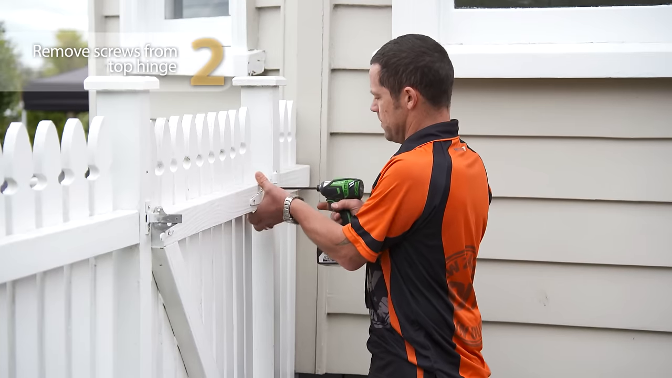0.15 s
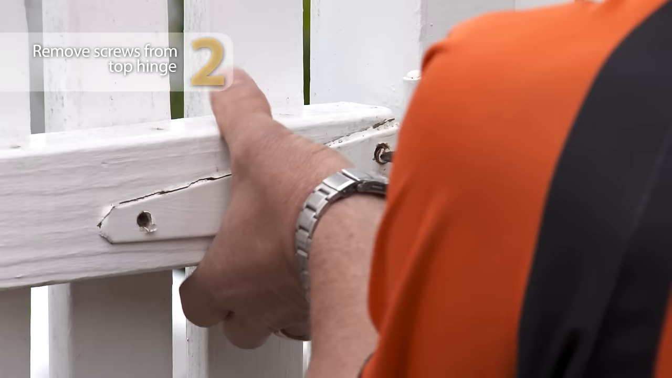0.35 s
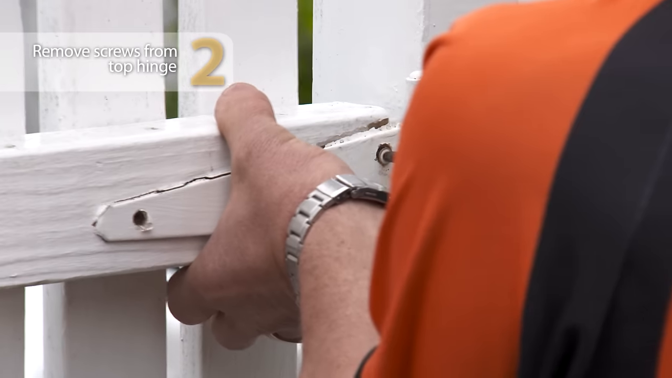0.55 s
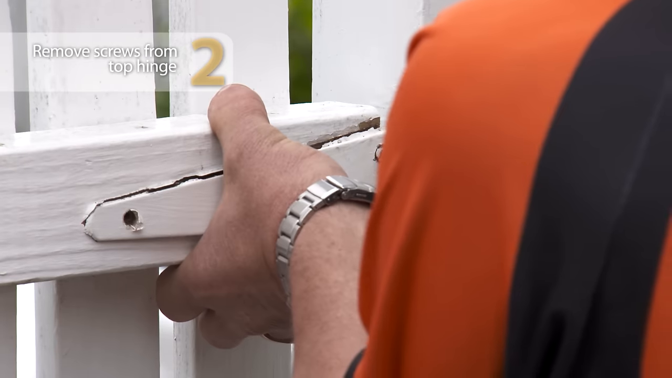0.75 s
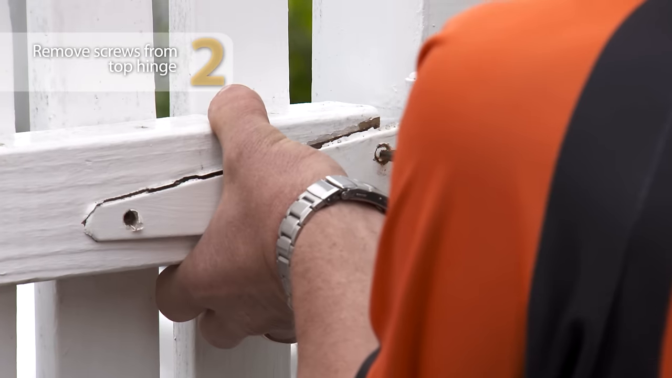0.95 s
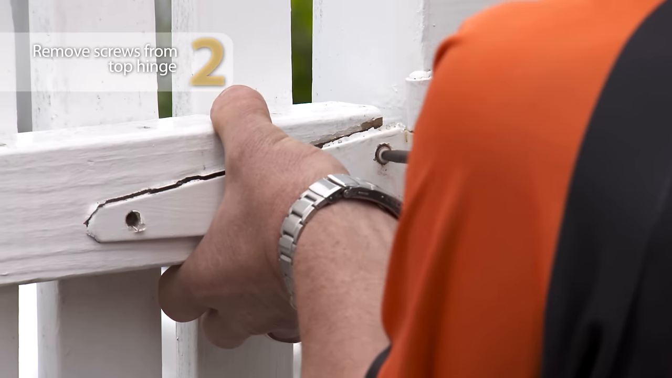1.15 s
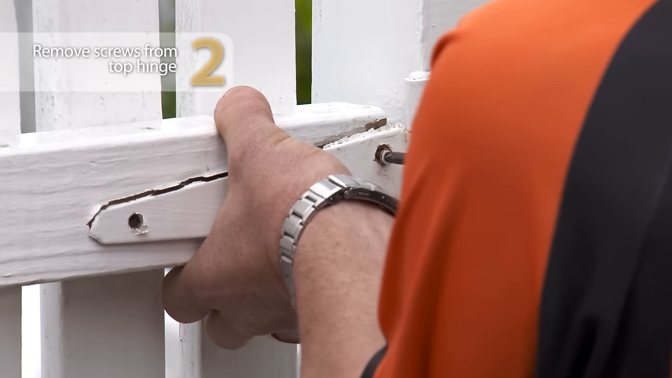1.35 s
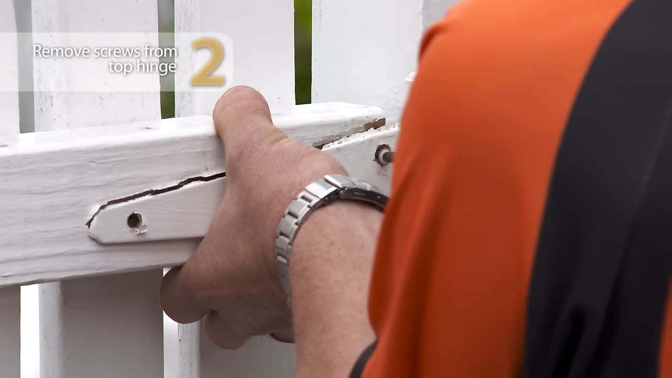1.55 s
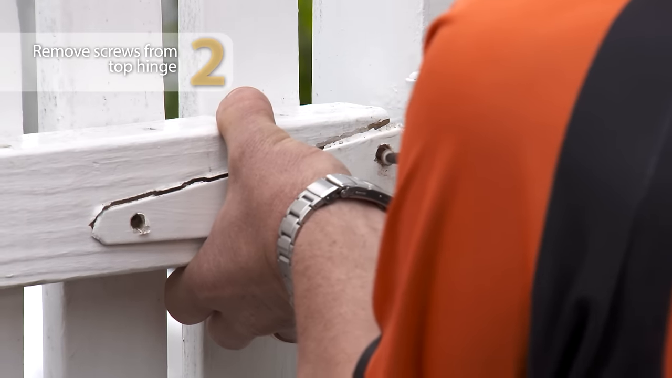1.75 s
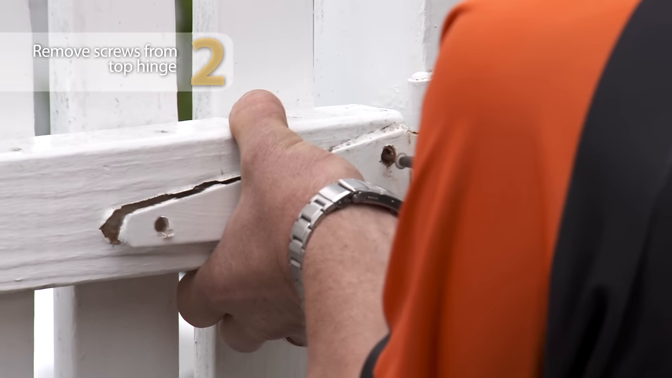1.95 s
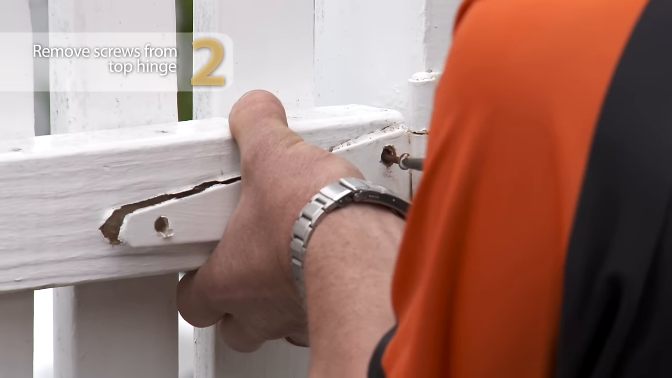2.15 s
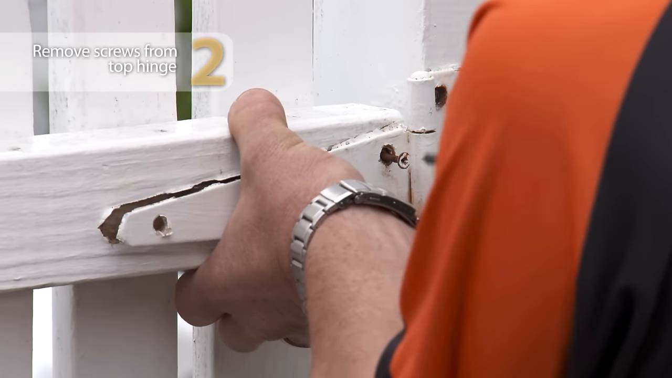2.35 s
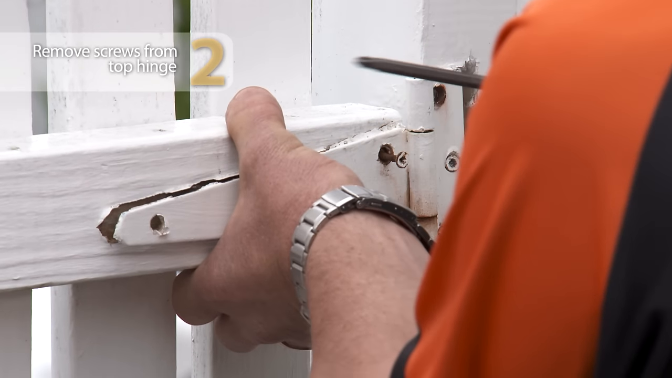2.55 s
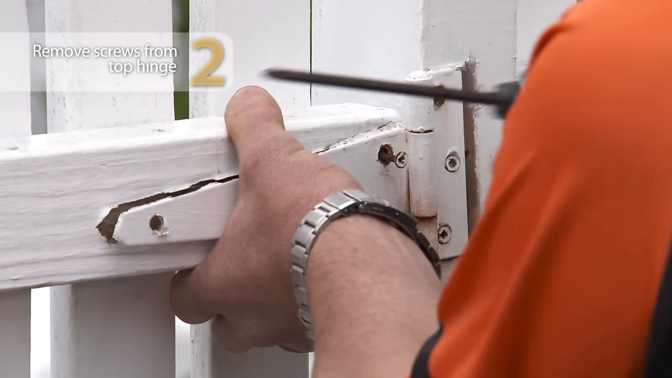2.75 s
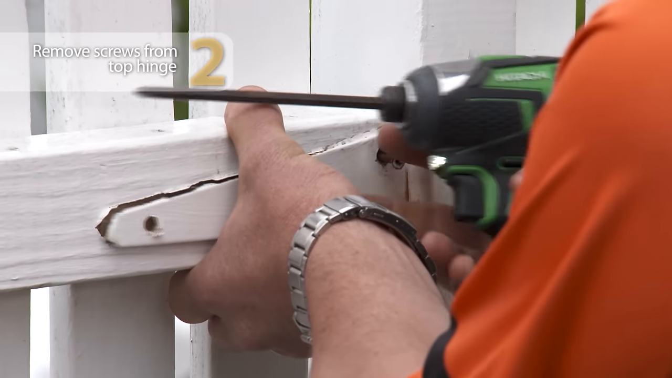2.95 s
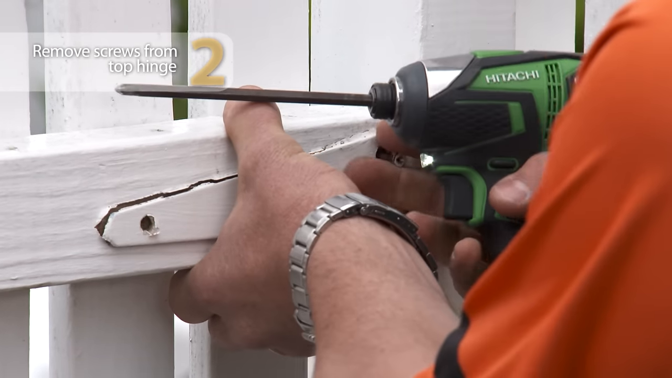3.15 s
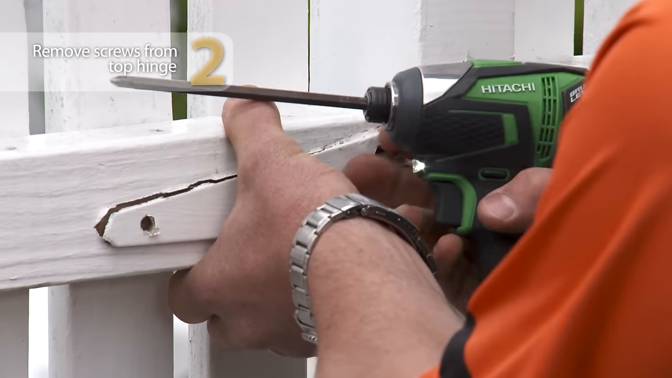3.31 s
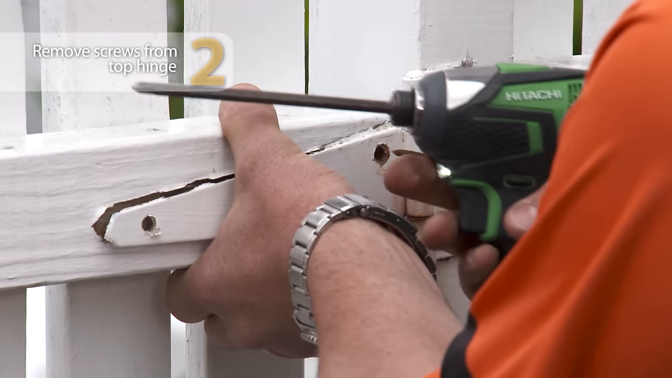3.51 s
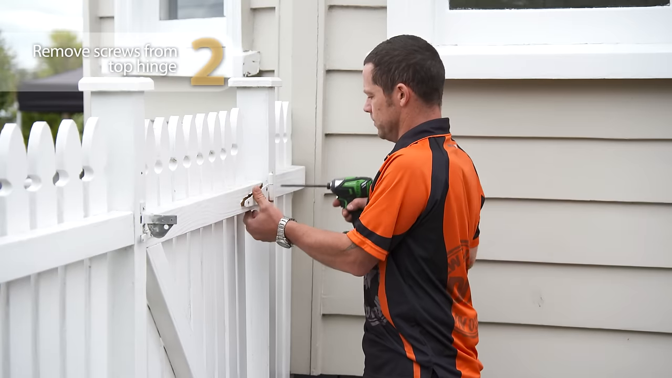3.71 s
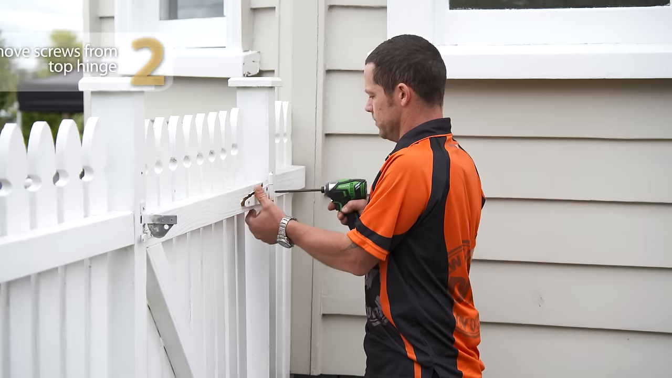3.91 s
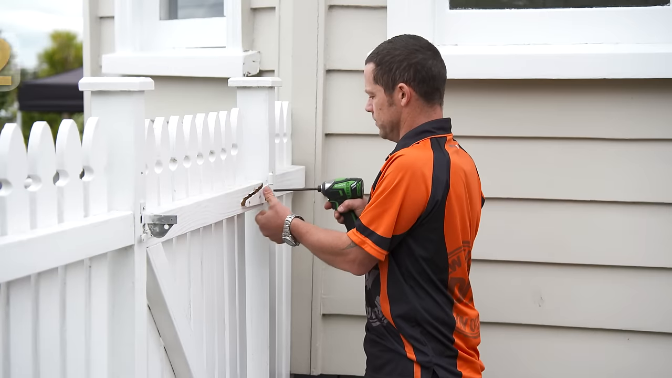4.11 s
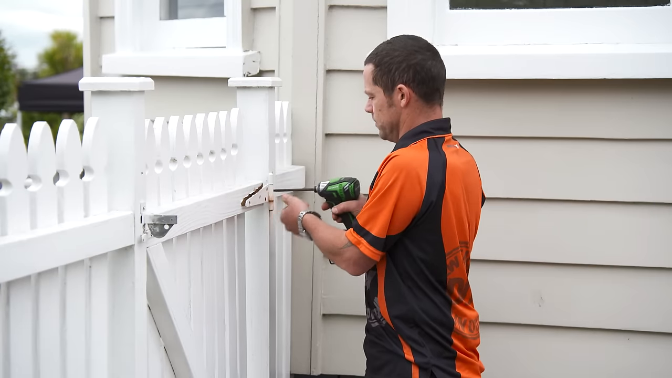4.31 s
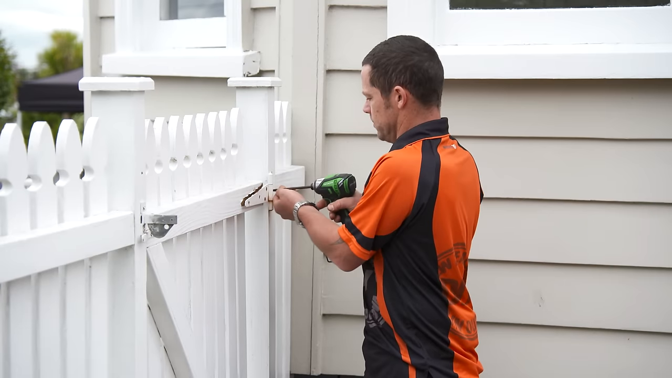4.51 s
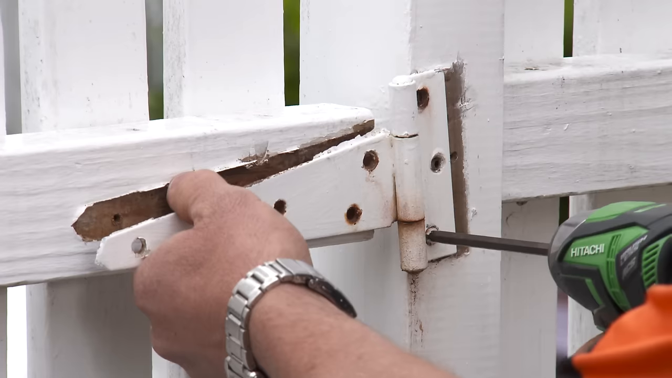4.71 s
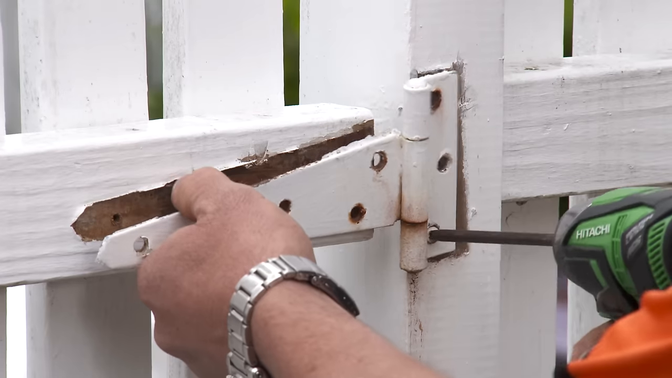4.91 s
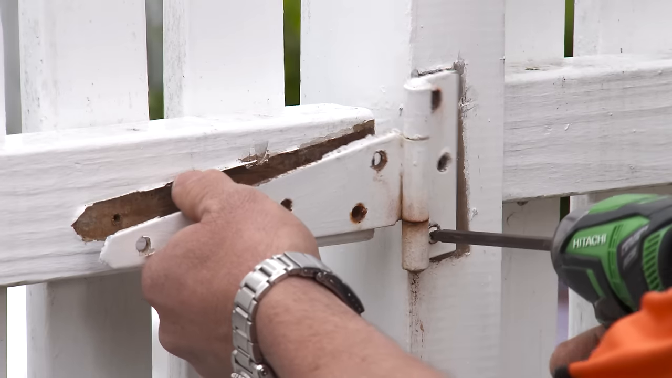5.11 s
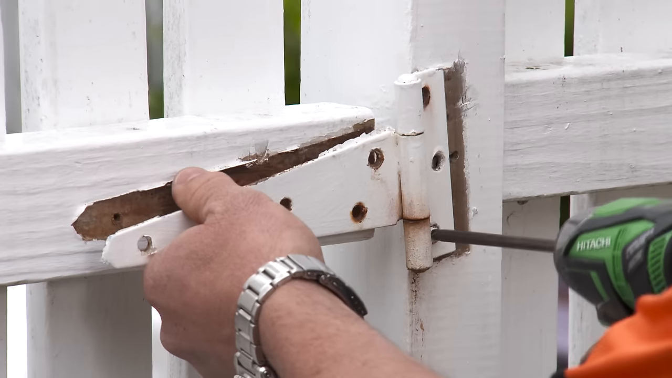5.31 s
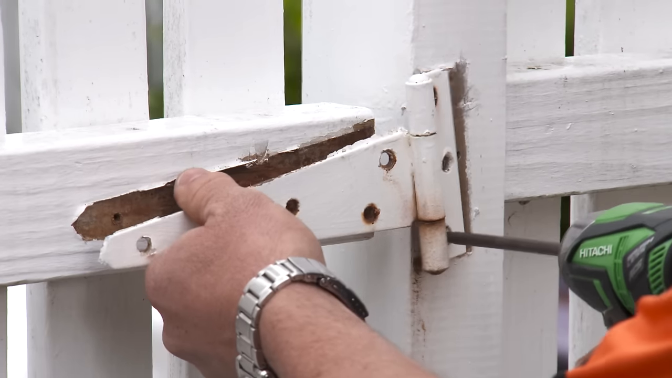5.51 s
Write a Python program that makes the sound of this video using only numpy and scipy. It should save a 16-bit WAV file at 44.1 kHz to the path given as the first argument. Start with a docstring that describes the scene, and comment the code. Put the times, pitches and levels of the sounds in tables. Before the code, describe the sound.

A cordless driver whirs in short bursts and one longer rising and falling whine, then hammers rapidly twice on a tight screw, outdoors.

```python
"""Impact driver at a gate

A cordless impact driver backs screws out of a hinge on a wooden gate, outdoors beside a house wall.
Free-running bursts come first: gear noise, fan and controller tones follow the motor, and a screw squeaks.
In two short bursts on a tight screw, steel hammer blows also ring the bit and make the post knock.
Echoes are decaying noise; a bird makes gliding tones, and a quiet suburb is filtered noise behind it all."""
import sys
import numpy as np
from scipy import signal
from scipy.fft import rfft, irfft
from scipy.io import wavfile
from scipy.ndimage import uniform_filter1d

SR = 44100
rng = np.random.default_rng(int(sys.argv[2]) if len(sys.argv) > 2 else 0)


def inscribe(sig):
    """Save sig as 16-bit PCM at rate SR to the path in sys.argv[1].

    A 1-D sig is mono; a 2-D sig holds one channel per row.
    Samples are clipped to [-1, 1] before scaling.
    """
    pcm = np.round(np.clip(np.atleast_2d(sig).T, -1, 1) * 32767)
    wavfile.write(sys.argv[1], SR, pcm.astype(np.int16))


N = 249867
T = np.arange(N) / SR  # the clock, in seconds

# motor speed and loudness, one list for each stretch of running:
# (time [s], motor speed [turns/s], load level [dB])
PULLS = [
    [(.537, 10.04, 2), (.57, 80, 2.5), (.6, 135, 2.5), (.64, 215, 1.5), (.665, 254, 1), (.71, 205, -2.5),
     (.745, 79.8, -9)],
    [(.799, 170, 0), (.815, 115, 0), (.84, 40.03, -14)],
    [(1.088, 9.72, 1), (1.12, 70, -0.5), (1.16, 170, 1), (1.195, 250, 0), (1.23, 286, 0.5),
     (1.26, 276, 1.5), (1.3, 220, -4), (1.328, 50.38, -7)],
    [(1.545, 10.12, -3), (1.6, 145, 1.5), (1.64, 225, -2), (1.68, 297, 2.5), (1.72, 355, 0.5),
     (1.75, 375, 1), (1.8, 387, 0.5), (1.87, 391, -1), (1.95, 395, 1.5), (2., 390, -1), (2.05, 379, 0.5),
     (2.1, 361, 1), (2.15, 335.8, -1.5), (2.2, 317, 0.5), (2.3, 275.9, -3.5), (2.38, 238, -4.5),
     (2.42, 206.04, -5.5), (2.44, 60.33, -2)],
    [(4.828, 5, -4), (4.88, 70, 4), (4.91, 120, 4), (4.96, 175, 0), (5.05, 170, 0), (5.11, 50, -6)],
    [(5.338, 9.88, -4), (5.38, 100, 6.5), (5.43, 180, 4), (5.56, 200, 1), (5.6, 130, -3.5), (5.65, 15, 0)],
]
# the controller's output; strongest under starting current, absent at full throttle and after release.
# One list for each stretch: (time [s], level [dB])
CHOPPING = [
    [(.537, -6), (.57, 4.5), (.63, 1), (.7, -9)],
    [(1.088, 0), (1.12, 2), (1.18, 6), (1.22, -6), (1.3, -9)],
    [(1.545, -3), (1.58, 3.5), (1.66, 4), (1.7, -5)],
    [(2.13, 0), (2.22, 2.5), (2.38, 3), (2.42, -14)],
    [(4.828, -3.5), (4.9, 2.5), (5.05, -2)],
    [(5.338, -1), (5.4, 1), (5.58, 0), (5.645, -15)],
]
# tones of the turning parts: (multiple of motor speed [x], level [dB], roughness [0-1])
GEAR_TONES = [(6, -16, 0.6), (6.27, -8.5, 0.58), (12, -17, 0.65), (18.4, -12.5, 0.9)]
# tones of the cooling fan: (multiple of motor speed [x], level [dB], roughness [0-1])
FAN_TONES = [(14, -11.5, .25), (28, -18, .3)]
# the switching tone, split by the passing motor poles: (offset in motor speeds [x], level [dB])
SIDEBANDS = [(-8, -61), (-4, -42), (4, -46.5)]
SWITCH_HZ = 9975
# colour of the gearbox and housing: (frequency [Hz], level [dB])
HOUSING = [(100, -16), (250, -6.5), (500, 1.5), (750, -0.5), (1200, 2.5), (2300, 5.5), (3100, 0.5),
           (4900, 3), (6000, -1.5), (7300, 0), (9500, -4), (13000, -10.5), (16000, -11.5)]


def motor():
    """Speed drives the gear rattle, the whine and the fan; the controller sings while it chops the current."""
    speed, drive, strain, chopping = np.zeros((4, N))
    for pull in PULLS:
        s, hz, load_db = np.transpose(pull)
        curve = np.interp(T, s, hz)
        acceleration = uniform_filter1d(np.gradient(curve, T), SR // 30)
        speed += (on_between(s) > 0) * curve
        strain += on_between(s) * np.tanh(acceleration / 1500)
        drive += on_between(s) * undb(np.interp(T, s, load_db))
    for stretch in CHOPPING:
        s, db = np.transpose(stretch)
        chopping += on_between(s) * undb(np.interp(T, s, db))
    # adding up the speed gives the turns so far; a tiny wander keeps it from being perfect
    turns = np.cumsum(speed * (1 + .0014 * walk(60.1))) / SR
    pace = speed / speed.max()  # 1 at top speed

    rattle = gear_rattle(turns, pace)
    # the mesh tone is damped while the motor gathers speed
    mesh_db = -27.5 - 3.6 * np.maximum(strain, 0)
    mesh = undb(mesh_db) * pace ** 1.2 * whine(turns, GEAR_TONES)
    fan = undb(-27) * pace ** 3.2 * whine(turns, FAN_TONES) * undb(1.6 * walk(39.9))
    gears_and_fan = undb(-28.5) * pace ** 0.78 * rattle + mesh + fan
    return drive * gears_and_fan + chopping * controller(turns)


def gear_rattle(turns, pace):
    """Teeth slap once a mesh and ring the housing; faster means brighter."""
    mesh_multiple = GEAR_TONES[1][0]
    mesh_swing = -1 + 0.32 * np.cos(2 * np.pi * mesh_multiple * turns)
    slaps = rng.standard_normal(N) * mesh_swing * undb(0.99 * walk(120))
    rattle = unit(colour(slaps + undb(-13) * pace * clatter(turns), HOUSING))
    # pace - 1 is negative, so slow running loses treble
    return rattle + band(rattle, 5900, 16000) * .5 * (pace - 1)


def clatter(turns, count=36):
    """Worn teeth repeat uneven patterns on every turn; two patterns drift in and out at random."""
    out = 0
    for _ in range(2):
        # harmonics 1 to count of one turn, with random sizes and phases
        harmonics = rng.standard_normal(count) + 1j * rng.standard_normal(count)
        pattern = unit(irfft(np.r_[0, harmonics], 4096))
        place = (turns % 1 * len(pattern)).astype(int)
        out = out + walk(20) * pattern[place]
    return out / np.sqrt(2)


def whine(turns, tones):
    """Tones locked to the shaft; unevenness roughens each one."""
    out = 0
    for multiple, db, rough in tones:
        wobble = (walk(260) + 1j * walk(260)) / np.sqrt(2)
        size = np.sqrt(1 - rough ** 2) + rough * wobble
        tone = np.real(size * np.exp(2j * np.pi * multiple * turns))
        out = out + np.sqrt(2) * undb(db) * tone
    return out


def controller(turns):
    """Chopping the current makes high tones around the switching rate, with a narrow hiss just below it."""
    tones = 0
    for offset, db in SIDEBANDS:
        phase = SWITCH_HZ * T + offset * turns
        tones = tones + undb(db + 1.5 * walk(90)) * np.sin(2 * np.pi * phase)
    hiss = undb(-52) * unit(band(rng.standard_normal(N), 8900, 9700))
    return tones + hiss


# hammer blows, the harder ones often led in by a few weaker taps; both levels are trimmed below: # (time [s],
# blow level [dB], knock passed to the post [dB])
BLOWS = [(4.881, -18, -27), (4.8897, -26, -25.5), (4.8989, -17, -25), (4.9071, -2.5, -25.5),
         (4.9286, -12, -21), (4.9354, -8, -20.5), (4.9422, -5.5, -23), (4.962, -12, -22.5),
         (4.9672, -10, -19), (4.9725, -5, -26), (4.9934, -17, -24), (4.9977, -10, -27), (5.0042, -6, -18),
         (5.0245, -13, -18), (5.0325, -6.5, -21.5), (5.0402, -7.5, -25.5), (5.0519, -18, -27),
         (5.3709, -20, -47), (5.3744, -14.5, -19.5), (5.3885, -12, -24.5), (5.3966, -4, -24.5),
         (5.4184, -13, -23.5), (5.4226, -8.5, -22), (5.4281, -3, -18), (5.449, -7, -19.5),
         (5.455, -4.5, -20.5), (5.4821, -5, -30), (5.5106, -5.5, -27.5), (5.5344, -11.5, -20.5),
         (5.5411, -4.5, -29)]
# modes (ringing notes) of the long driver bit: (frequency [Hz], level [dB], time to fall 60 dB [s])
SHANK = [(4350, 0.5, 0.054), (4765, -2.5, 0.054), (5630, -3, .04), (5850, -2.5, 0.05), (6190, -5.5, 0.063),
         (6935, -1, 0.051), (7700, -4, .04)]


def hammer():
    """The hammer hits the anvil and rebounds; harder blows are brighter up to a limit, and the bit rings on."""
    out = np.zeros(N)
    for s, db, _ in BLOWS:
        treble_db = min(1.5 * (db + 7.5), 4)
        add(out, s, undb(db - 2.5) * clank(t60=0.019, treble_db=treble_db))
    bit_ring = undb(-19) * ring(out, SHANK)
    post_knock = undb(6) * post([(s, db) for s, _, db in BLOWS])
    return out + bit_ring + post_knock


# colour of the steel hammer and anvil: (frequency [Hz], level [dB])
STEEL = [(100, -40), (400, -16.5), (1500, -3.5), (2600, -4.5), (3800, -3), (5200, 0), (6300, 3.5),
         (7500, 1.5), (10000, 0), (13000, -5), (16000, -9)]


def clank(t60, treble_db):
    """Steel on steel: a burst of filtered noise with a fast attack; its treble fades first."""
    t = T[:SR // 16]
    steel = colour(rng.standard_normal(len(t)), STEEL)
    steel = unit(colour(steel, [(7500, 0), (11500, treble_db)]))
    duller = colour(steel, [(6000, 3.5), (13000, -11.5)])
    fresh = np.exp(-t / 0.0063)  # slides from the bright sound to the duller one
    attack = 1 - np.exp(-t / 0.00067)
    return (fresh * steel + (1 - fresh) * duller) * attack * fade(t, t60)


# modes of the gate post and hinge: (frequency [Hz], level [dB], time to fall 60 dB [s])
POST = [(297, -9.5, 0.17), (394, -3.5, 0.048), (464, -0.5, 0.071), (541, 0, 0.069), (644, -6, .04),
        (817, -4, 0.065), (946, -4, 0.047), (1046, 0, 0.059), (1192, -4, 0.027), (1545, -5, 0.066),
        (1863, 2, 0.038), (2184, -8, 0.044), (2720, -3, .025)]


def post(rows):
    """Each (time [s], level [dB]) jolt passes down the bit as a short judder and rings the gate post."""
    t, push = T[:SR // 16], np.zeros(N)
    for s, db in rows:
        add(push, s, undb(db) * rng.standard_normal(len(t)) * fade(t, .016))
    # bending waves in timber: the lows arrive late
    hz, lag_at_500 = np.fft.rfftfreq(N, 1 / SR), .002  # lag in seconds at 500 Hz
    delay = np.exp(-4j * np.pi * lag_at_500 * np.sqrt(500 * hz))
    push = irfft(rfft(push) * delay, N)
    return ring(band(push, 220, 5500), POST)


# the bit knocking in the screw head; both levels are trimmed below:
# (time [s], knock level [dB], knock passed to the post [dB])
KNOCKS = [(0.539, -23.5, -45), (0.5465, -14.5, -37), (0.7632, -31, -41), (0.774, -28, -42),
          (0.7872, -27, -41), (0.7991, -15, -30.5), (2.4573, -39, -44), (2.5148, -39, -47),
          (5.1133, -31, -44), (5.1417, -29.5, -44)]


def bit():
    """The bit seats and slips in the screw head; light touches are duller."""
    out = np.zeros(N)
    for s, db, _ in KNOCKS:
        add(out, s, undb(db - 10) * clank(t60=0.038, treble_db=0.77 * (db + 19.5)))
    return out + undb(5.5) * post([(s, db) for s, _, db in KNOCKS])


# the screw thread squeaking through the hinge; levels are trimmed below:
# (time [s], level [dB], pitch [Hz])
SQUEAKS = [(2.1177, -15.5, 3470), (2.1354, -18, 2170), (2.1488, -16, 2500), (2.1654, -20, 2160),
           (2.1804, -25, 1840), (2.2204, -17, 1770), (2.2297, -17.5, 2160)]


def screw():
    """The thread sticks and lets go in short, gritty squeaks made of narrow and wide bands of noise."""
    out, t = np.zeros(N), T[:SR // 12]
    shape = (1 - np.exp(-t / 0.0012)) * fade(t, 0.062)
    for s, db, hz in SQUEAKS:
        grit = rng.standard_normal(len(t))
        pitched = unit(band(grit, hz / 1.106, hz * 1.138))
        scrape = undb(-5) * unit(band(grit, 1700, 8100))
        add(out, s, undb(db - 4.5) * (pitched + scrape) * shape)
    return out


def yard(x, early_db, late_db, t60):
    """Quick reflections from the wall and the pickets, then a faint open-air tail, one set for each ear."""
    t, out = T[:SR // 2], []
    for _ in range(2):
        early = band(rng.standard_normal(len(t)), 170, 15000) * fade(t, 0.045) * (t > .002)
        late = band(rng.standard_normal(len(t)), 200, 6200) * fade(t, t60) * (t > .018)
        early = undb(early_db) * early / np.linalg.norm(early)
        late = undb(late_db) * late / np.linalg.norm(late)
        out.append(x + signal.fftconvolve(x, early + late)[:N])
    return np.array(out)


# calls of a far bird: (middle of the call [s], start pitch [Hz], end pitch [Hz], peak level [dB])
CHIRPS = [(.47, 4480, 4220, -55.5), (2.785, 4340, 4700, -56)]


def bird():
    """Short, faint gliding calls, each a pure tone that swells and fades."""
    out, t = np.zeros(N), T[:SR // 20]
    for s, start_hz, end_hz, db in CHIRPS:
        phase = np.cumsum(np.linspace(start_hz, end_hz, len(t))) / SR
        add(out, s - t[-1] / 2, undb(db) * np.hanning(len(t)) * np.sin(2 * np.pi * phase))
    return out


# colour of the outdoor background: (frequency [Hz], level [dB])
AIR = [(25, -6), (62, -4.5), (90, -4), (130, -1.5), (300, -4.5), (650, -3.5), (1000, -10), (2000, -19.5),
       (4000, -25.5), (7000, -32), (8400, -25.5), (9300, -34), (16000, -36.5)]
# background loudness, before a small lift and a slight wander: (time [s], level [dB])
AIR_LEVEL = [(0, -49.5), (.5, -49), (1., -48), (1.5, -48.5), (2.6, -50), (3.2, -51), (4.7, -50.5),
             (5.2, -47), (5.67, -49)]
# stereo width, as a change to the left-right difference: (frequency [Hz], level [dB])
AIR_SIDE = [(25, 0), (60, -13), (130, -4), (400, -8), (2000, -8.5), (16000, 1.5)]


def suburb():
    """Far traffic and a thin high hiss, both filtered noise, widest in the deep bass and the top treble."""
    mid, side = (unit(colour(rng.standard_normal(N), AIR)) for _ in range(2))
    side = colour(side, AIR_SIDE)
    db = np.interp(T, *np.transpose(AIR_LEVEL)) + .5 * walk(6)
    return undb(db + 0.5) * np.array([mid + side, mid - side])


def undb(db):
    """Decibels to gain."""
    return 10 ** (np.asarray(db) / 20)


def unit(x):
    """Scale to an average (rms) size of 1."""
    return x / np.sqrt(np.mean(x ** 2))


def contour(points, hz):
    """Gain of a (frequency [Hz], level [dB]) curve at the given frequencies."""
    f, db = np.transpose(points)
    return undb(np.interp(np.log(hz + 1), np.log(f), db))


def colour(x, points):
    """Filter by a (frequency [Hz], level [dB]) curve."""
    return irfft(rfft(x) * contour(points, np.fft.rfftfreq(len(x), 1 / SR)), len(x))


def band(x, lo_hz, hi_hz):
    """Gentle band-pass: keep what lies between two frequencies."""
    return signal.sosfilt(signal.butter(2, [lo_hz, hi_hz], "band", fs=SR, output="sos"), x)


def walk(rate):
    """Smooth random wander with rms 1, heading for a new value `rate` times a second."""
    k = int(SR / rate)
    steps = np.repeat(rng.standard_normal(N // k + 1), k)
    return unit(uniform_filter1d(steps, k)[:N])


def add(out, s, x):
    """Mix x into out at time s, in seconds."""
    i = int(s * SR)
    out[i:i + len(x)] += x[:N - i]


def fade(t, t60):
    """Exponential decay that falls 60 dB in t60 seconds."""
    return np.exp(-np.log(1000) * t / t60)


def on_between(s):
    """On from the first time to the last, with quick edges."""
    return np.clip(np.minimum(T - s[0], s[-1] - T) / 0.0034, 0, 1)


def ring(x, modes):
    """Pass x through a set of damped modes, each a decaying sine."""
    t = T[:SR // 4]
    response = 0
    for hz, db, t60 in modes:
        response = response + undb(db) * np.sin(2 * np.pi * (hz * t + rng.random())) * fade(t, t60)
    return signal.fftconvolve(x, response / np.linalg.norm(response))[:N]


def scene():
    """The driver at the gate, straight ahead, and the bird share the echoes; the suburb lies behind."""
    sources = motor() + hammer() + bit() + screw() + bird()
    return yard(sources, early_db=-15, late_db=-24, t60=0.53) + suburb()


def record(dry):
    """The recorder cuts the top: a steep low-pass."""
    top_hz = 15900
    return signal.sosfilt(signal.ellip(10, .2, 70, top_hz, fs=SR, output="sos"), dry)


dry = scene()
out = record(dry)
inscribe(out)
```